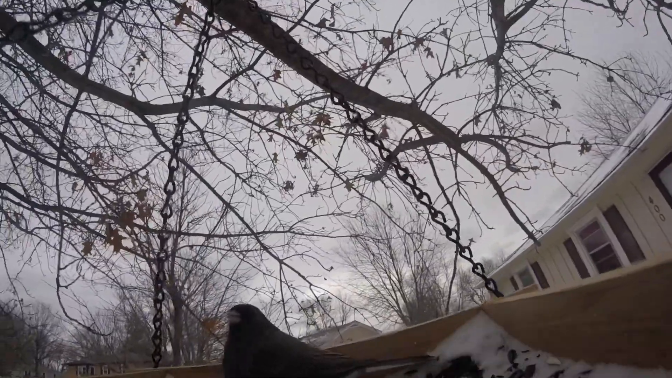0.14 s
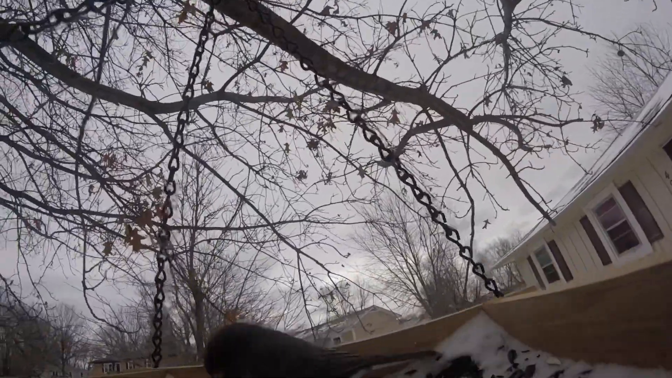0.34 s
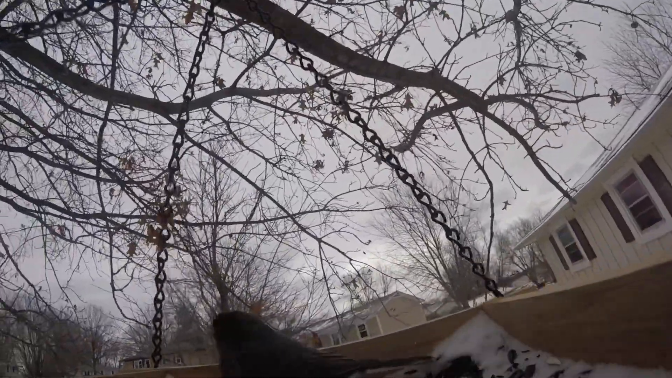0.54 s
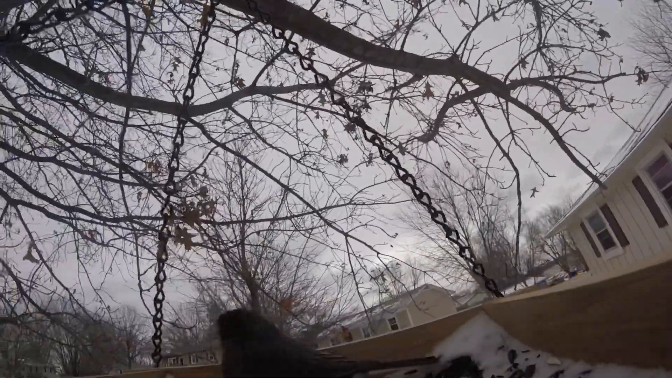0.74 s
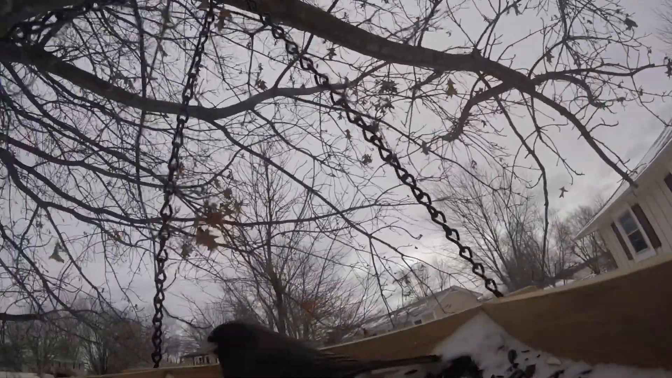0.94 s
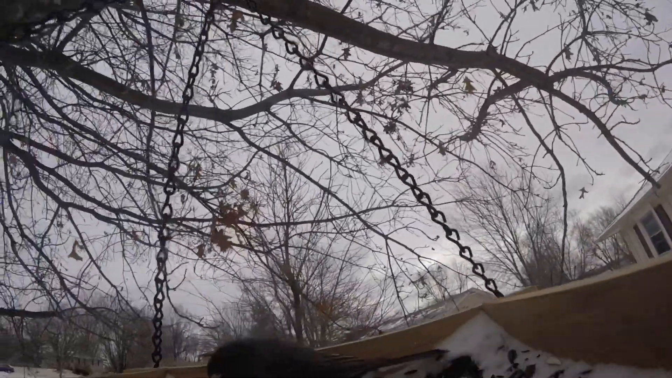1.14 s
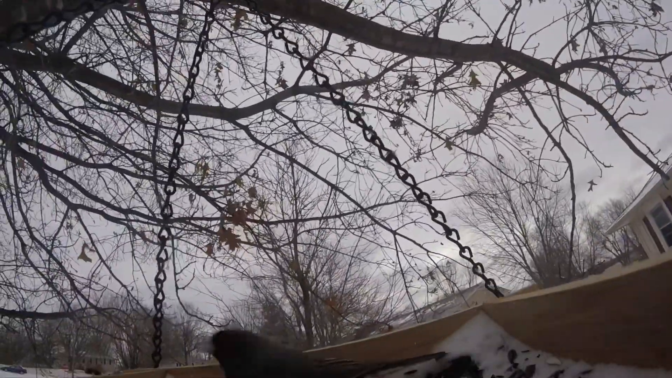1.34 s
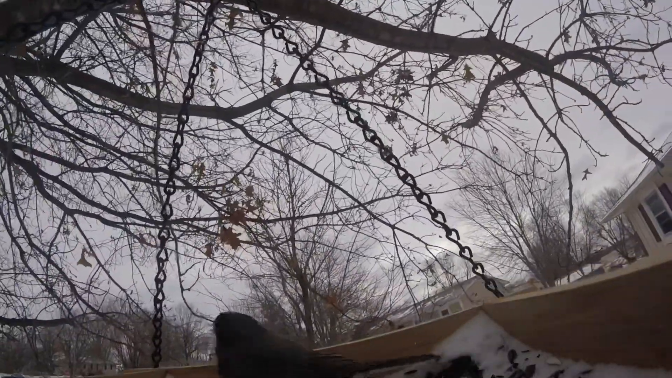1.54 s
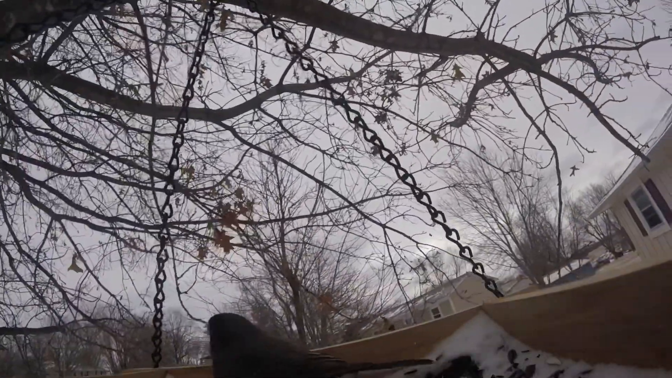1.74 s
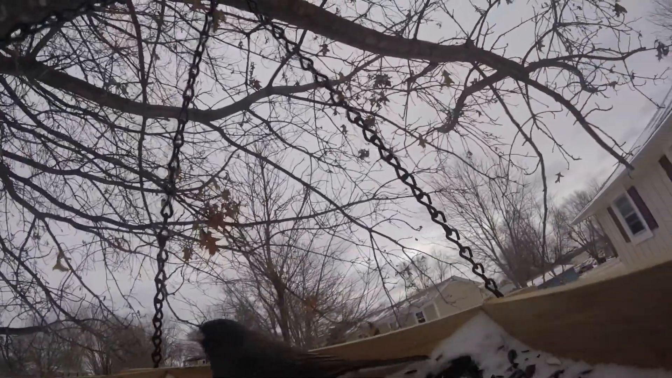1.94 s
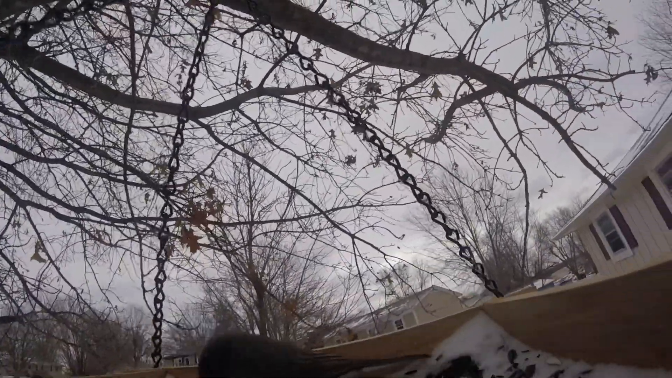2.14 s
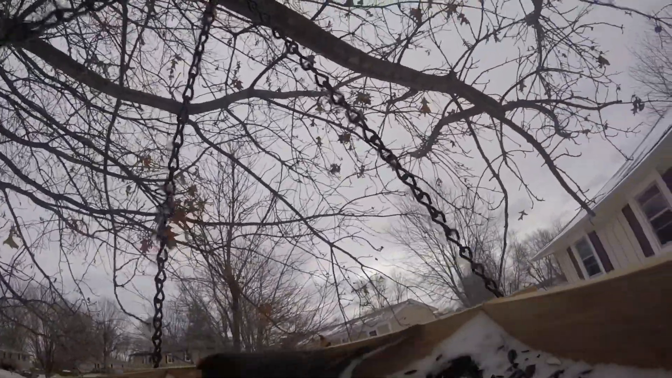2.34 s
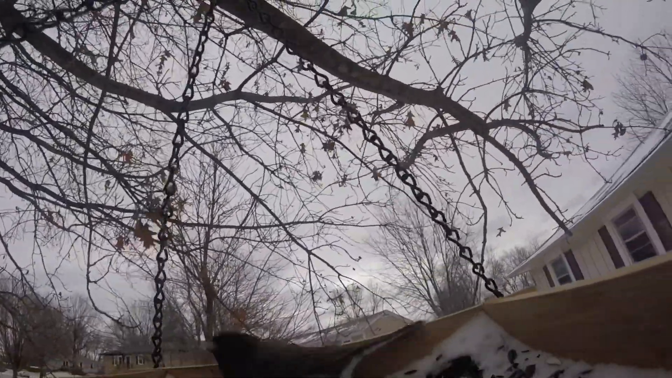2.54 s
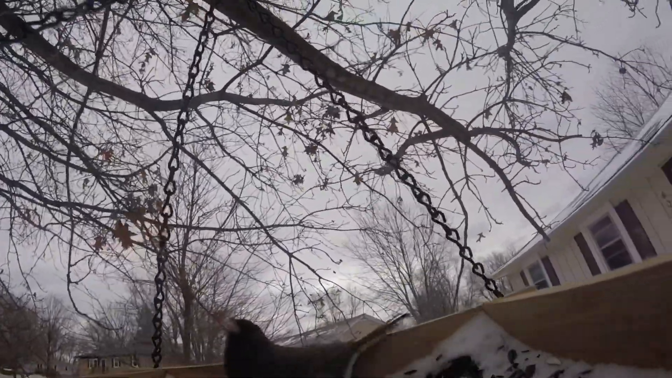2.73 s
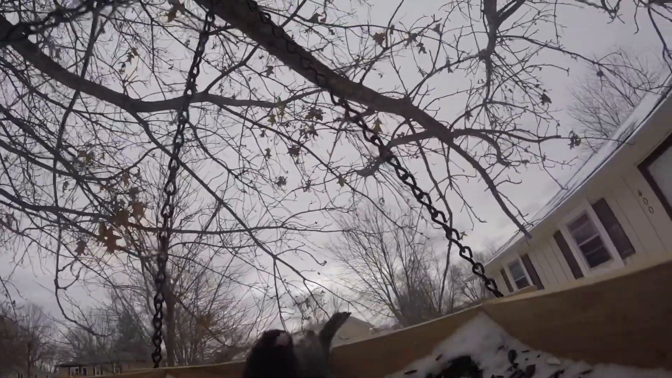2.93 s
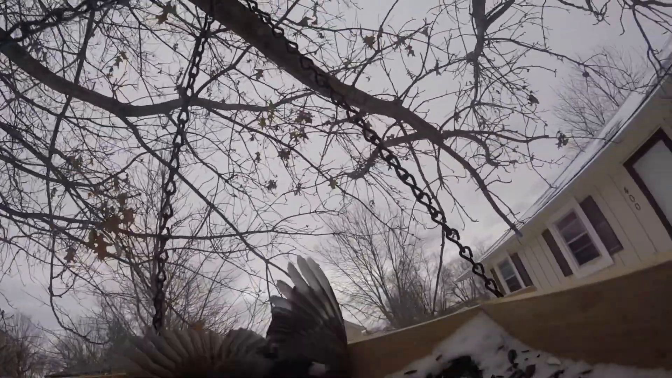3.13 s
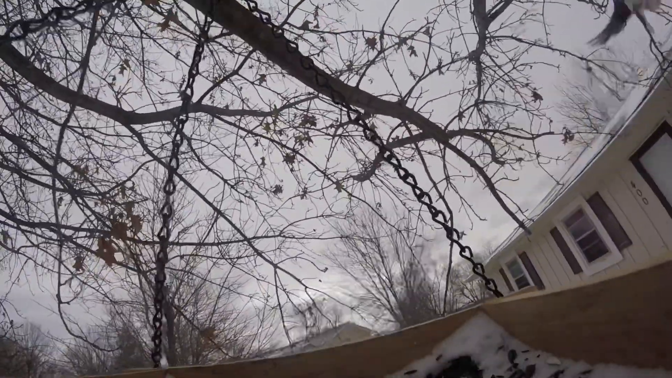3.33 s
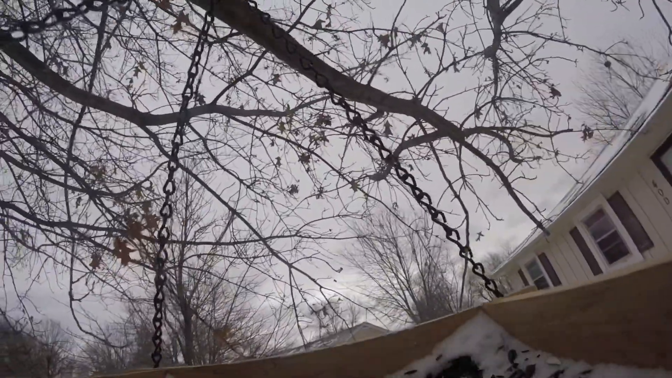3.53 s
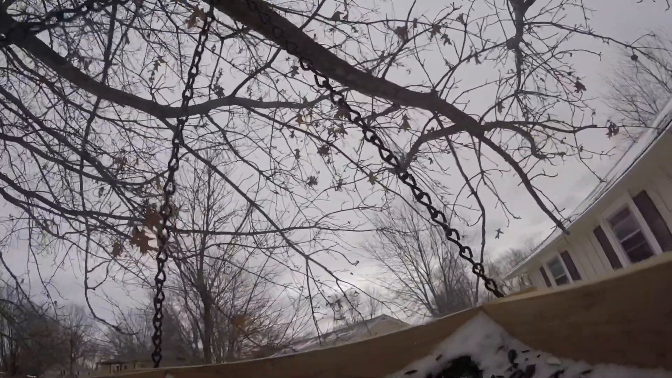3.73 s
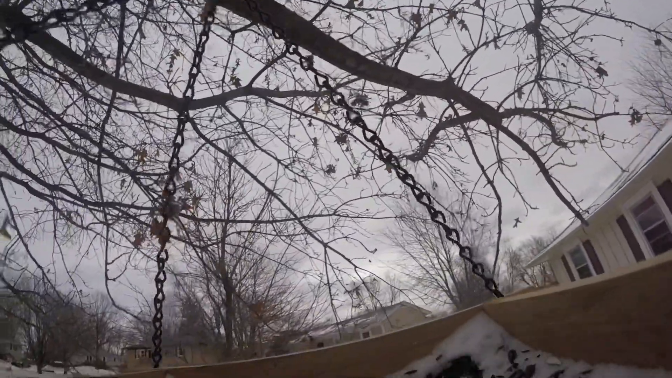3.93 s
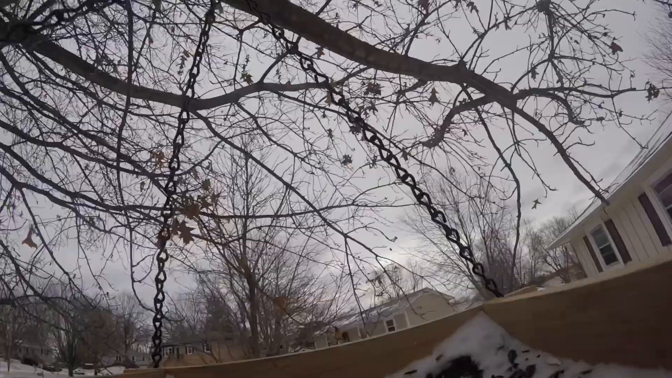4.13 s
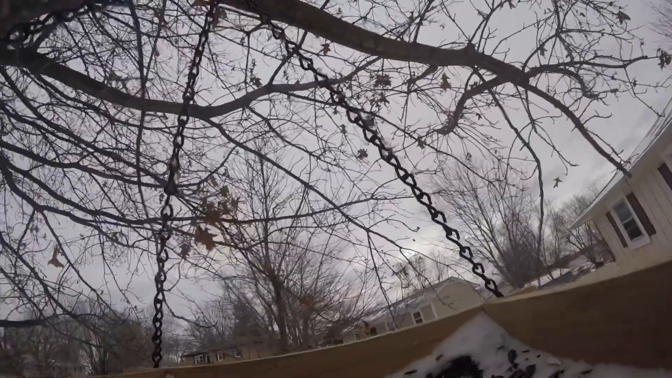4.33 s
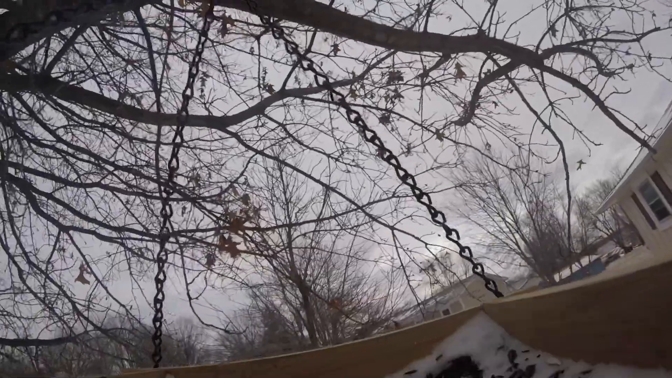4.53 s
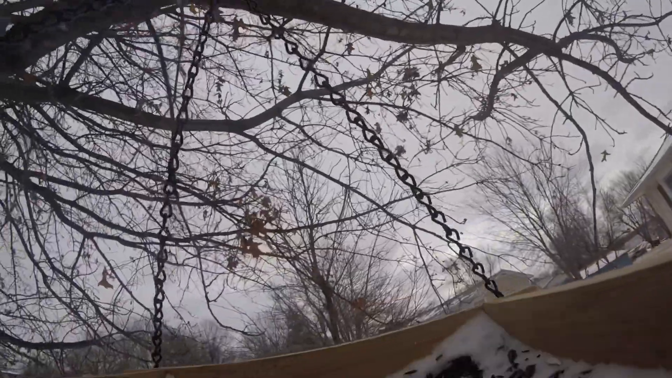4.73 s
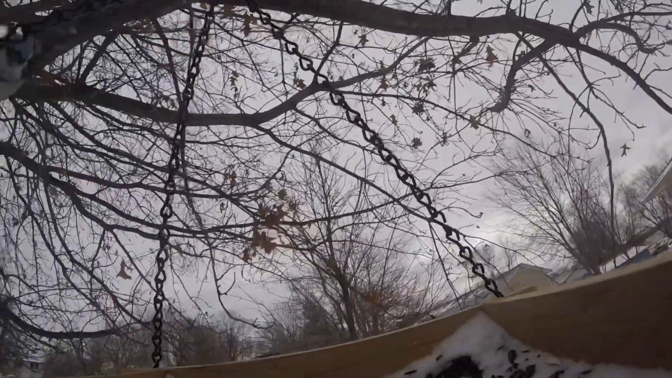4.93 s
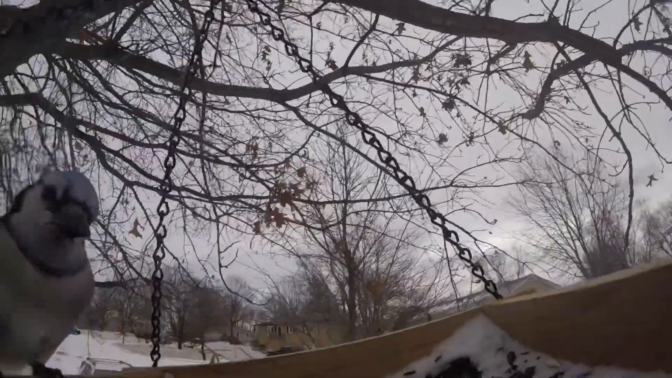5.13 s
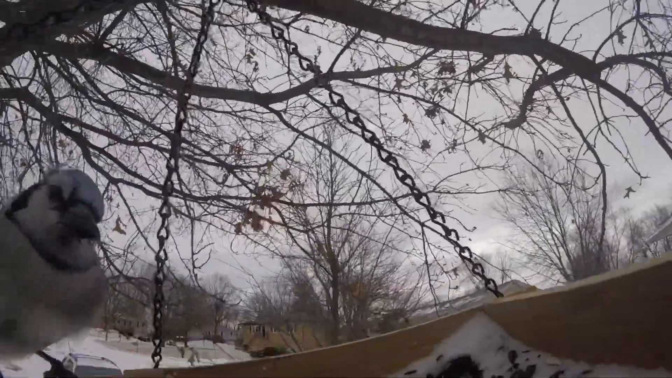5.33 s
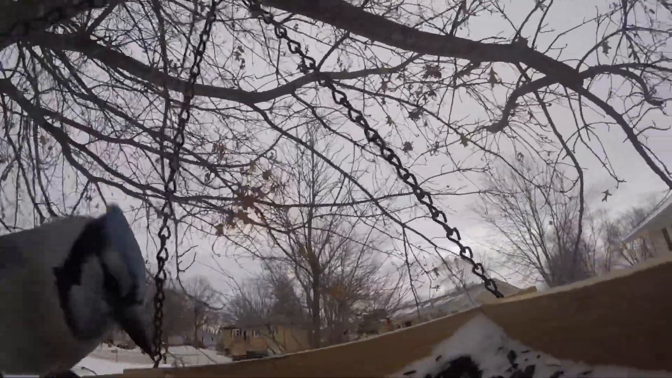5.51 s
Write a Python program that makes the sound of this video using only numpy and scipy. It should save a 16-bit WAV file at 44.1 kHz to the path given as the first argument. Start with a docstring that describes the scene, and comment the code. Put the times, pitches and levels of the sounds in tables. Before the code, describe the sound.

Sparse pecks and seed ticks on a wooden tray, a takeoff flurry, a quiet humming pause, then one hard woody thump and creaking.

```python
"""A camera's steady hiss and thin whine run throughout, with the rocking of a hanging wooden seed tray.
A small bird pecks and hops on the tray, where the camera lies; it flies off and a heavier bird lands.
Blows and knocks ring the wood as fading tones; seeds click and slide as short bursts and grains of noise.
The swinging chains slip in small jerks that make the tray hum, and wind makes rocking and creak wander."""
import sys
import numpy as np
from scipy import signal
from scipy.fft import rfft, irfft
from scipy.io import wavfile

SR = 44100
rng = np.random.default_rng(int(sys.argv[2]) if len(sys.argv) > 2 else 0)


def wav_record(signal):
    """Record a signal, one row per channel, as 16-bit PCM in the file named by sys.argv[1]."""
    frames = np.transpose(np.atleast_2d(signal))
    bounded = np.clip(frames, -1, 1)
    # unit amplitude maps onto the largest positive 16-bit level
    quanta = np.round(bounded * 32767).astype(np.int16)
    wavfile.write(sys.argv[1], SR, quanta)


N = 250047
T = np.arange(N) / SR  # time of every sample [s]


def undb(db):
    """Turn decibels into a plain factor."""
    return 10 ** (np.asarray(db) / 20)


def level(x, db):
    """Scale a sound so that its average (RMS) level is db."""
    return x * undb(db) / np.sqrt(np.mean(x ** 2))


def lookup(table, x):
    """Read a two-column table at x, with straight lines between its rows."""
    return np.interp(x, *np.transpose(table))


def band(x, lo_hz, hi_hz, order=2):
    """Keep mainly the pitches between lo_hz and hi_hz."""
    return signal.sosfilt(signal.butter(order, [lo_hz, hi_hz], "bandpass", fs=SR, output="sos"), x)


def add(out, start_s, sound):
    """Mix a sound in at its start time, cut off where the scene ends."""
    at = int(start_s * SR)
    out[at:at + len(sound)] += sound[:len(out) - at]


def fading(t, t60):
    """Die away by 60 dB in t60 seconds."""
    return np.exp(-np.log(1000) * t / t60)


def wander(per_s):
    """Random levels joined by straight lines, per_s of them each second."""
    steps = rng.standard_normal(int(N / SR * per_s) + 2)
    return np.interp(T * per_s, np.arange(len(steps)), steps)


def grains(count, rate, spread_db):
    """Sparse clicks, about rate per second, of either sign; a few are much larger than the rest."""
    chance, sign, size = rng.random((count, 3)).T
    happens = chance < rate / SR
    return happens * np.sign(sign - .5) * undb(-spread_db * np.log(1 - .985 * size))


def ring(x, hz, t60):
    """One mode (a fading tone of the wood or case) driven by x; a unit blow gives a unit ring."""
    turn_and_fade = np.exp(2j * np.pi * hz / SR - np.log(1000) / (t60 * SR))
    return signal.lfilter([1], [1, -turn_and_fade], x).imag


def nearness(hz, spot_hz, octaves, least_db=-16):
    """Modes close in pitch to the favoured one are driven hardest."""
    distance = np.log2(hz / spot_hz) / octaves
    return undb(least_db) + np.exp(-.5 * distance ** 2)


def strike(modes, share, ms, free):
    """The ring of a set of modes after a push that builds up over ms; free scales their ring times."""
    hz, db, t60 = np.array(modes).T[:, :, None]
    t = T[:SR // 2]
    rise = np.sin(np.pi / 2 * np.clip(t * 1000 / ms, 0, 1)) ** 2
    tones = undb(db) * rise * fading(t, free * t60) * np.sin(2 * np.pi * hz * t)
    return share @ tones


# colour of the hiss: (pitch [Hz], relative level per Hz [dB])
HISS_COLOUR = [(150, -8.5), (260, 1), (353, -2), (566, -5), (606, -5), (1210, -10), (1610, -11.5),
               (2590, -13), (8050, -24.5), (9860, -26.5), (14100, -31), (14800, -50)]
# thin tones of the camera electronics: (pitch [Hz], level [dB])
WHINE_TONES = [(9593, -86.5), (9652, -82.5), (10427, -89.5), (11208, -99)]
HISS_DB = -60.5


def camera():
    """Steady preamplifier hiss and a few thin high tones that waver slightly."""
    hz, db = np.transpose(HISS_COLOUR)
    colour = undb(np.interp(np.log(np.fft.rfftfreq(N, 1 / SR) + 1), np.log(hz), db))
    hiss = level(irfft(rfft(rng.standard_normal(N)) * colour, N), HISS_DB)
    waver = .012 * np.cumsum(rng.standard_normal(N))  # shared phase drift [radians]
    whine = 0
    for hz, db in WHINE_TONES:
        tone = np.sin(2 * np.pi * (hz * T + rng.random()) + waver)
        whine = whine + np.sqrt(2) * undb(db) * tone
    return hiss + whine


# the hanging tray before wind: (time [s], low rocking level [dB], drive of the chain creak [dB])
TRAY_SWING = [(0, -51.5, -50), (.55, -52, -51.5), (1.06, -46.5, -51), (1.31, -50, -48), (1.42, -44.5, -49),
              (1.67, -51, -41), (2.0, -52, -53.5), (2.55, -51.5, -48.5), (2.7, -49, -40.5),
              (2.87, -42, -45.5), (3.08, -51.5, -46), (3.2, -27, -51), (3.32, -41, -58), (3.39, -33.5, -55),
              (3.5, -43.5, -48.5), (4.05, -52, -52), (4.55, -48.5, -47), (5.051, -51.5, -52.5),
              (5.121, -13, -47), (5.19, -27.5, -23.5), (5.27, -21, -24), (5.33, -27.5, -32),
              (5.43, -30, -33.5), (5.48, -24.5, -26), (5.56, -34, -36), (5.67, -33.5, -47.5)]
# harder creaking favours higher modes: (drive of the creak [dB], favoured pitch [Hz])
CREAK_PITCH_BY_DRIVE = [(-57, 125.6), (-19.5, 176)]
# modes of the board, also used by blows: (pitch [Hz], relative level [dB], basic ring time to -60 dB [s])
BOARD_MODES = [(61, -29, 0.42), (89.4, -3, 0.19), (110.4, -8, 0.19), (119.3, 0, 0.38), (143.2, 0.5, 0.2),
               (155.2, -6.5, 0.25), (185.1, 2, 0.31), (207.9, -6, 0.32)]
# modes of the stiff rim, also used by knocks: (pitch [Hz], relative level [dB], basic ring time to -60 dB [s])
RIM_MODES = [(283, 9.5, 0.15), (401, 6.5, 0.064), (482, 4.5, 0.057), (593, 5, 0.064), (651, -0.5, 0.12),
             (730, 5.5, 0.05), (875, 3.5, 0.09), (986, -0.5, 0.068), (1188, 2.5, 0.056), (1540, -4, 0.066)]
GUST_DB, GUSTS_PER_S = 2, 9  # size and pace of the wandering in the wind


def swing():
    """Slow rocking thumps the microphone; chain links slip in small jerks that drive the tray modes."""
    s, rock_points, creak_points = np.transpose(TRAY_SWING)
    rock_db = np.interp(T, s, rock_points) + GUST_DB * wander(GUSTS_PER_S)
    creak_db = np.interp(T, s, creak_points) + GUST_DB * wander(GUSTS_PER_S)
    rock = level(band(rng.standard_normal(N), 9.6, 40.7), 0) * undb(rock_db)
    jerks = level(grains(N, 60, 4.1), 0)
    slips = (jerks + 0.52 * rng.standard_normal(N)) * undb(creak_db)
    creak_hz = lookup(CREAK_PITCH_BY_DRIVE, creak_db)
    board_hum = sum(undb(db) * ring(slips * nearness(hz, creak_hz, 0.32), hz, t60)
                    for hz, db, t60 in BOARD_MODES)
    board_hum = band(board_hum, 40, 317)  # soft slips hardly reach above the board modes
    rim_hum = sum(undb(db) * ring(slips, hz, t60) for hz, db, t60 in RIM_MODES)
    return rock + undb(-37.5) * (board_hum + undb(-30.5) * rim_hum)


# resonances of the camera case: (pitch [Hz], width [Hz], relative level [dB])
CASE_MODES = [(1590, 430, 3.5), (2025, 153, 9), (2600, 480, 4.5), (3330, 370, 1.5), (3710, 104, 6),
              (4450, 1900, -10.5)]


def case(x):
    """What ticks near the microphone rings the case (body) and also arrives as thin treble (air)."""
    body = 0
    for k, (hz, width, db) in enumerate(CASE_MODES):
        t60 = np.log(1000) / (np.pi * width)  # a wider resonance dies sooner
        body = body + (-1) ** k * undb(db) * ring(x, hz, t60) * width / SR
    air = band(x, 4630, 6870) + 0.18 * band(x, 8900, 14000)
    return level(band(body, 700, 5000), 0), level(air, 0)


# seeds and feathers sliding over the tray: (start [s], end [s], level of the body [dB], treble against body [dB])
SEED_SLIDES = [(1.328, 1.374, -65.5, -14), (1.625, 1.678, -63, -15), (1.7, 1.855, -70, -16),
               (2.593, 2.69, -66, -15), (2.788, 2.833, -59, -18), (2.84, 2.962, -70, -14),
               (3.001, 3.006, -52.5, -13), (3.144, 3.217, -58, -25), (3.198, 3.245, -41, -21),
               (3.254, 3.343, -69, -4), (3.38, 3.466, -67, -11), (5.09, 5.136, -49, -10),
               (5.145, 5.207, -53, -7.5), (5.22, 5.223, -55, -7), (5.246, 5.319, -54, -7),
               (5.348, 5.41, -61.5, -11), (5.406, 5.447, -55.5, -7.5), (5.464, 5.526, -64, -10),
               (5.525, 5.59, -63, -6)]


def slides():
    """Dense small grains over friction noise, swelling and stopping with each slide."""
    bumps = level(grains(N, 2000, 3.4), 0)
    friction = 0.66 * rng.standard_normal(N)
    body, air = case(bumps + friction)
    out = np.zeros(N)
    for start, end, db, bright_db in SEED_SLIDES:
        swell = np.interp(T, [start, start + 0.016, end - .008, end + 0.02], [0, 1, 1, 0])
        out += undb(db) * swell * (body + undb(bright_db) * air)
    return out


# seeds struck or dropped: (time [s], strength [dB], pitch [Hz], brightness [dB])
SEED_CLICKS = [(0.792, -46.5, 2590, -20), (1.3136, -24.5, 2350, -23), (1.3323, -39, 2160, -18),
               (1.611, -31, 2730, -18.5), (1.6202, -37, 2650, -23), (1.6458, -41, 2660, -23),
               (1.734, -41, 2390, -30), (1.7593, -42.5, 2620, -27), (1.8053, -38.5, 2460, -24),
               (2.361, -36.5, 2520, -20), (2.6313, -25.5, 2440, -31), (2.6366, -33, 2180, -23),
               (2.6415, -19.5, 3020, -27), (2.806, -44, 2670, -19), (2.844, -38, 2660, -18),
               (2.8632, -23, 2880, -21.5), (2.8883, -27.5, 2470, -22), (3.0149, -36.5, 2330, -32),
               (3.125, -43.5, 2320, -27), (3.156, -47, 2510, -21), (3.1688, -35, 2550, -21),
               (3.1767, -27.5, 2660, -19), (3.184, -23.5, 2100, -20), (3.2076, -11.5, 2620, -22),
               (3.2114, -21.5, 2480, -29), (3.224, -35, 2600, -27), (3.236, -36, 2510, -21),
               (3.2473, -35, 2580, -16), (3.2634, -43, 3100, -19), (3.272, -38.5, 2520, -21),
               (3.2904, -39, 3100, -18), (3.3034, -46, 2180, -7), (3.3129, -39, 3100, -22),
               (3.3478, -27.5, 2080, -20), (3.377, -45.5, 2150, -14), (3.396, -34.5, 2660, -24),
               (3.4064, -43, 2610, -22), (3.4214, -47, 3580, -20), (3.4704, -52.5, 2810, -5),
               (3.786, -45.5, 3330, -22), (5.0882, -19, 2100, -27), (5.0911, -29, 2790, -17),
               (5.1104, -34, 2610, -11.5), (5.1232, -33.5, 2520, -9), (5.161, -35, 3250, -11.5),
               (5.2574, -38.5, 2220, -17.5), (5.3354, -43, 3220, -19), (5.4016, -46.5, 2550, -21),
               (5.4385, -37.5, 3700, -21), (5.5045, -48, 2670, -15), (5.5438, -36, 2600, -14),
               (5.5623, -40.5, 3570, -15.5)]
# build-up by strength: (strength [dB], build-up [ms])
CLICK_BUILD_UP = [(-43, 1.4), (-26.5, 1.36), (-12, 2)]
# dying time by strength: (strength [dB], time to -60 dB [s])
CLICK_FADE = [(-51, 0.031), (-39, .045), (-20, 0.037)]


def clicks():
    """A struck seed cracks at its own pitch while husks and neighbours patter with it."""
    out, t = np.zeros(N), T[:SR // 5]
    body, air = case(grains(N + len(t), 2500, 3.2))
    for s, db, hz, bright_db in SEED_CLICKS:
        at = int(s * SR)
        crack = level(band(rng.standard_normal(len(t)), hz * 0.883, hz * 1.193), 0)
        patter = 0.3 * body[at:at + len(t)] + 0.7 * undb(bright_db) * air[at:at + len(t)]
        rise = np.clip(t * 1000 / lookup(CLICK_BUILD_UP, db), 0, 1)
        fade = fading(t, lookup(CLICK_FADE, db))
        add(out, s, undb(db) * rise * fade * (0.28 * crack + patter))
    return out


# hard knocks that ring the rim: (time [s], strength [dB], favoured pitch [Hz], spread of driven modes [octaves])
RIM_KNOCKS = [(1.315, -32.5, 820, 0.28), (1.611, -48, 570, 0.51), (1.614, -45, 1220, 0.22),
              (1.807, -53, 804, 0.16), (2.361, -42.5, 560, .42), (2.634, -37.5, 434, 0.63),
              (2.643, -33, 900, 0.11), (2.82, -54, 520, 0.41), (2.864, -37.5, 400, 0.31),
              (2.865, -34, 780, 0.46), (2.891, -51.5, 500, 0.6), (3.182, -36.5, 554, 0.65),
              (3.209, -29, 915, 0.23), (3.221, -35.5, 422, 0.17), (3.224, -35, 750, 0.3),
              (3.246, -49, 870, 0.24), (3.315, -55, 730, .25), (3.47, -54, 740, 0.23),
              (3.738, -52, 395, 0.075), (4.431, -47, 770, 0.11), (4.433, -54, 395, .1),
              (4.568, -56.5, 740, 0.071), (5.089, -8.5, 538, 0.2), (5.09, -17, 843, 0.14),
              (5.101, -24, 760, 0.16), (5.125, -36, 690, 0.28), (5.131, -38, 1230, .08),
              (5.158, -45, 980, .087), (5.182, -47, 734, .12), (5.204, -45, 686, 0.15),
              (5.223, -45, 600, 0.18), (5.261, -32.5, 750, 0.18), (5.312, -50.5, 935, .3),
              (5.33, -35.5, 636, 0.13), (5.378, -47.5, 645, 0.39), (5.415, -50, 635, .2),
              (5.463, -56, 420, .28), (5.504, -40.5, 710, 0.22), (5.548, -49.5, 730, .27),
              (5.596, -51, 690, 0.3)]
# a harder landing presses the wood and shortens its ring: (strength [dB], factor on the ring time)
RIM_FREEDOM = [(-46.5, 1.28), (-24, 0.45)]
# the lowest rim mode answers by where the birds stand: (time [s], drive relative to the knock [dB])
LOWEST_RIM_DRIVE = [(1.9, -1), (2.36, -22), (2.64, -5), (2.87, -19), (3.25, -13), (5.09, -13), (5.13, 1)]
NARROW_RING = 0.15  # power by which a knock driving few modes rings longer
EMPTY_FROM_S, EMPTY_TO_S = 3.55, 5.05  # no bird on the tray
EMPTY_BOARD, EMPTY_RIM = 1.24, 1.86  # the empty tray rings this many times longer


def knocks():
    """Beak, claws and chain hooks ring the stiff rim; neighbouring modes move in opposite sense."""
    out, hz = np.zeros(N), np.array(RIM_MODES)[:, 0]
    scatter = undb(1.73 * rng.standard_normal((len(RIM_KNOCKS), len(hz))))
    scatter = scatter * (-1) ** np.arange(len(hz))
    for (s, db, spot_hz, octaves), size in zip(RIM_KNOCKS, scatter):
        share = nearness(hz, spot_hz, octaves, least_db=-22)
        share[0] = undb(lookup(LOWEST_RIM_DRIVE, s))
        free = lookup(RIM_FREEDOM, db) * (0.27 / octaves) ** NARROW_RING
        if EMPTY_FROM_S < s < EMPTY_TO_S:
            free *= EMPTY_RIM
        add(out, s, undb(db - 7.0) * strike(RIM_MODES, share * size, 0.6, free))
    return out


# feet, beak and chain jolts that flex the board:
# (time [s], strength [dB], pitch of the modes nearest the spot [Hz], build-up [ms])
BOARD_BLOWS = [(0.426, -49, 131, 4.9), (0.932, -38, 115, 9.3), (1.314, -16.5, 97, 5.4),
               (1.343, -28, 132, 2.2), (1.385, -32.5, 113, 7.8), (1.61, -27.5, 106, 4.7),
               (1.649, -34, 144, 4.1), (1.807, -37, 113, 1.9), (2.36, -26, 111, 5), (2.64, -26, 120, 2.9),
               (2.661, -27.5, 160, 4.4), (2.846, -20.5, 78.4, 6.9), (2.863, -30.5, 204, 2.4),
               (2.887, -31.5, 153, 3.3), (2.909, -36, 144, 8.8), (3.18, -22.5, 222, 4.8),
               (3.185, -22, 154, 8.5), (3.209, -17.5, 153, 8.1), (3.235, -28.5, 96, 2.4),
               (3.261, -32, 135, 2.9), (3.293, -19.5, 126, 13), (3.317, -16, 141, 14),
               (3.347, -18.5, 137, 8.9), (3.363, -10.5, 80, 8.1), (3.384, -33, 94, 2.6),
               (3.433, -26, 97, 9.6), (3.47, -19, 93, 7.2), (3.5, -27, 73.4, 7.6), (3.748, -26.5, 115, 30),
               (3.799, -35, 115, 4), (3.997, -36.5, 117, 13), (4.154, -43, 205, 5.0), (4.21, -47, 117, 4),
               (4.387, -42, 188, 4.5), (4.436, -33.5, 116, 8.5), (4.57, -38, 114, 7),
               (4.645, -46, 122, 4.6), (4.72, -48, 122, 4.4), (5.086, -7.5, 178, 5.4),
               (5.122, -14, 182, 2.5), (5.203, -19, 167, 7.4), (5.243, -20, 172, 5.3),
               (5.263, -25, 176, 1.8), (5.331, -31.5, 143, 4.7), (5.4, -28, 170, 10.4),
               (5.428, -19.5, 146, 12.6), (5.469, -20.5, 107, 10.5), (5.511, -22.5, 182, 7.6),
               (5.582, -22.5, 123, 11), (5.628, -30.5, 165, 11)]
# a harder landing presses the wood and shortens its ring: (strength [dB], factor on the ring time)
BOARD_FREEDOM = [(-42.5, 0.65), (-20.5, 0.57)]
BOARD_LAG_S = 0.0027  # the heavy board answers a little after the contact


def blows():
    """Soft pushes flex the board; where they land sets the share of each mode."""
    out, hz = np.zeros(N), np.array(BOARD_MODES)[:, 0]
    scatter = undb(3.03 * rng.standard_normal((len(BOARD_BLOWS), len(hz))))
    for (s, db, spot_hz, ms), size in zip(BOARD_BLOWS, scatter):
        share = nearness(hz, spot_hz, 0.18) * size
        free = lookup(BOARD_FREEDOM, db)
        if EMPTY_FROM_S < s < EMPTY_TO_S:
            free *= EMPTY_BOARD
        add(out, s + BOARD_LAG_S, undb(db - 2.5) * strike(BOARD_MODES, share, ms, free))
    return out


def scene():
    """Add all the sounds together as one channel."""
    wood = blows() + knocks()
    seeds = clicks() + slides()
    background = swing() + camera()
    return (wood + seeds + background)[None, :]


def record(dry):
    """The camera cuts the treble steeply above 14750 Hz."""
    return signal.sosfilt(signal.ellip(10, .2, 90, 14750, fs=SR, output="sos"), dry)


dry = scene()
out = record(dry)
wav_record(out)
```